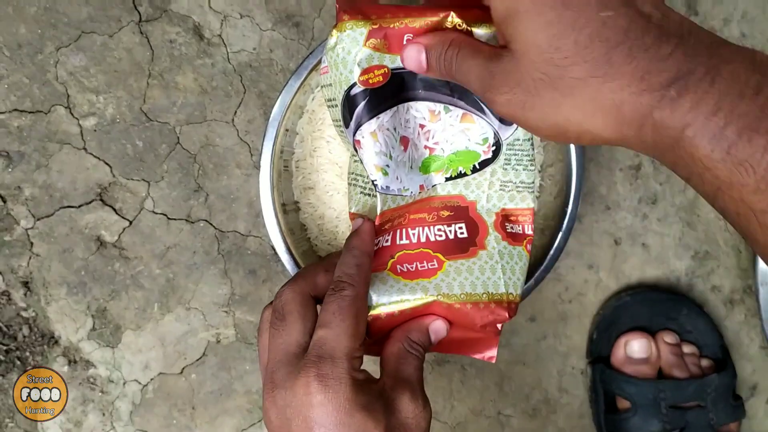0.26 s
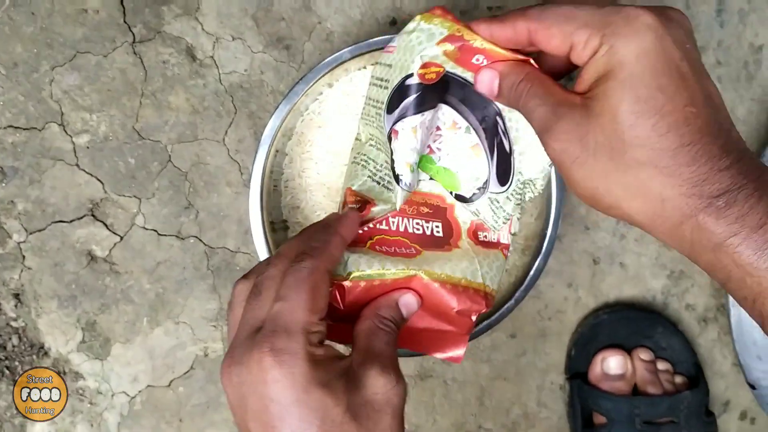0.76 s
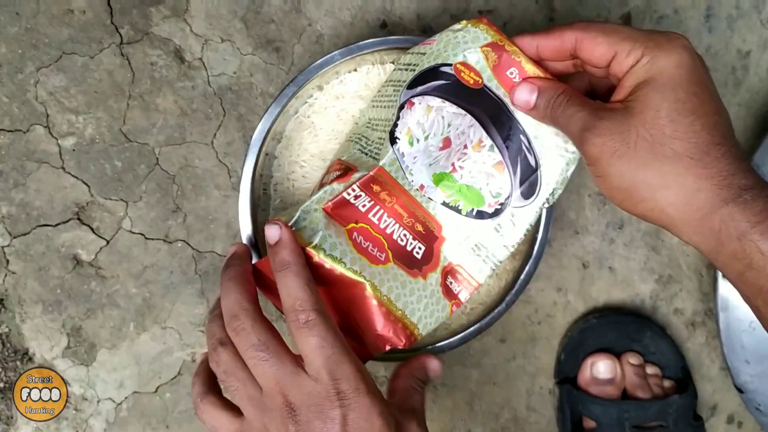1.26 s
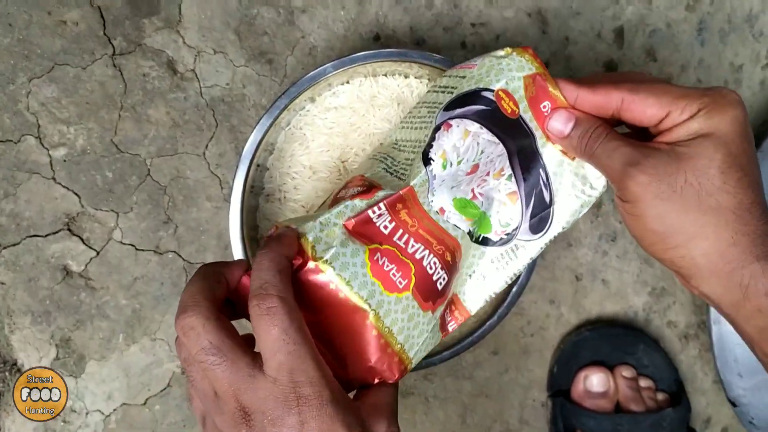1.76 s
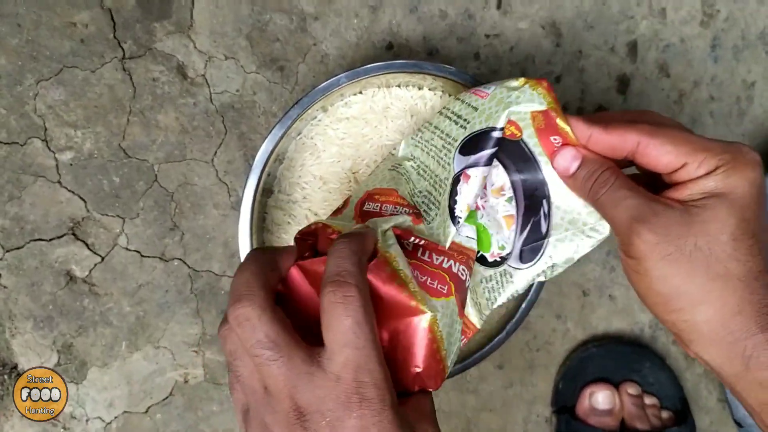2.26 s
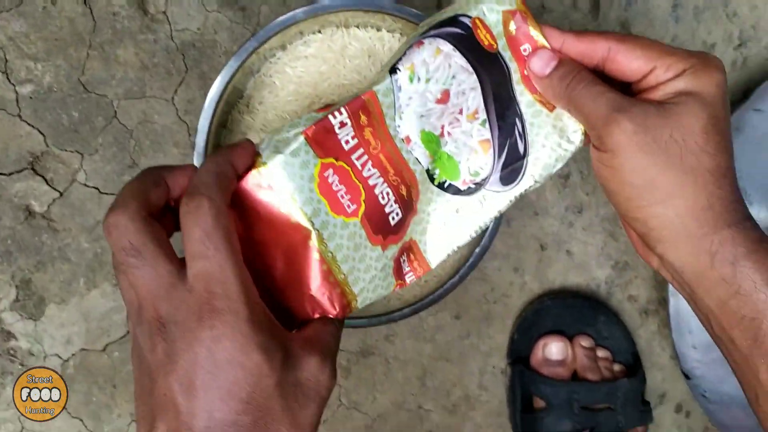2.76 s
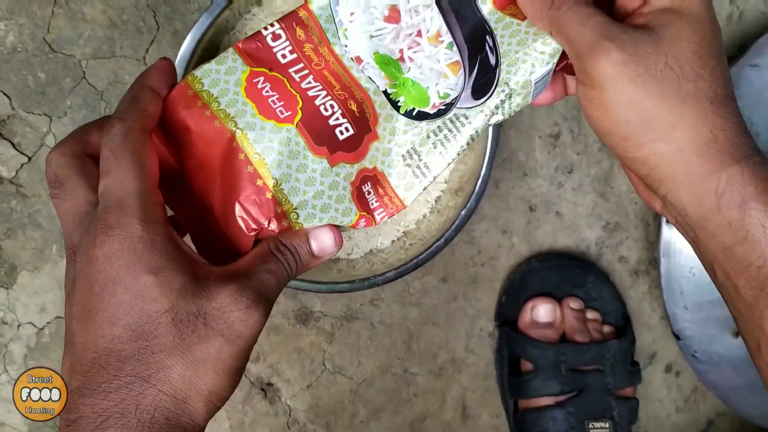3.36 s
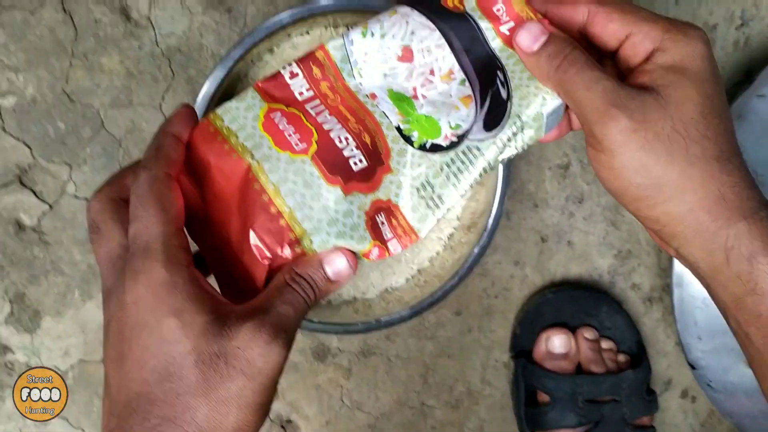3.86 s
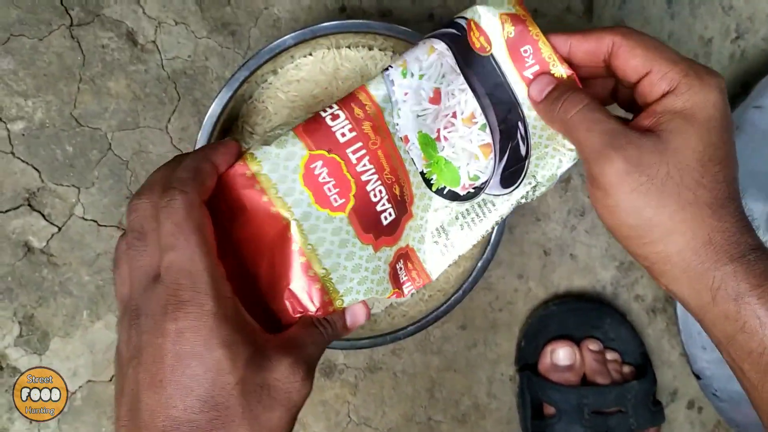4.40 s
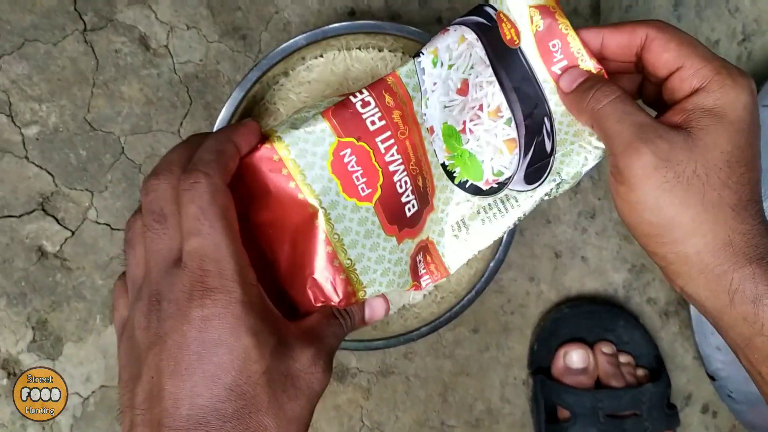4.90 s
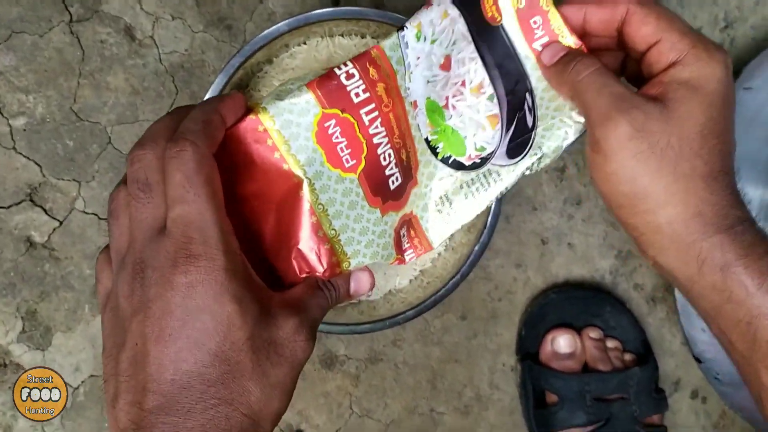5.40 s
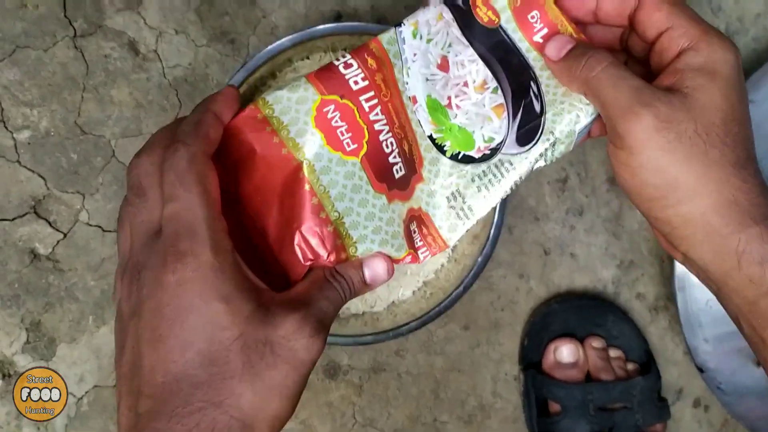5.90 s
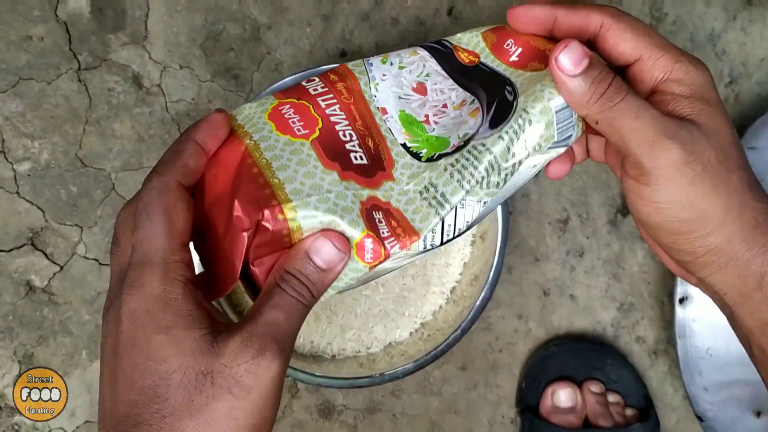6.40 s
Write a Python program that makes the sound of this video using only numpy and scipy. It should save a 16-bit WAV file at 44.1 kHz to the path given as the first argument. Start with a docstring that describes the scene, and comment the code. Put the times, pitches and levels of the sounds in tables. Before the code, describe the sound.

Dry rice falls in uneven shakes onto a heap in a metal bowl, each spill a fine high hiss with ticking grains. The thin bag buckles with hollow knocks and sharp crackles, and grains scrape along its film. Spilling is densest in the first half; later there is mainly handling and a few small spills. Close microphones, dry open yard, faint low hum.

```python
"""A thin run of dry rice and soft hollow pops of a plastic bag are heard first, close to the microphones.
Shaken from the bag onto a heap in a steel bowl, grains patter and ping as random impacts with decaying modes.
Grains spray crisply and slip along the film in rasps of narrow noise; the buckling bag pops and crinkles.
Once a fold snaps open and lets go a gush. The loaded bowl rings faintly over a low outdoor rumble."""
import sys
import numpy as np
from scipy import signal
from scipy.fft import rfft, irfft, next_fast_len
from scipy.io import wavfile
from scipy.ndimage import uniform_filter1d, map_coordinates

SR = 44100
rng = np.random.default_rng(int(sys.argv[2]) if len(sys.argv) > 2 else 0)


def pcm_store(signal):
    """Save signal as 16-bit PCM."""
    levels = np.round(np.clip(np.atleast_2d(signal), -1, 1) * 32767)
    wavfile.write(sys.argv[1], SR, levels.astype(np.int16).T)


N = 293166
TIME = np.arange(N) / SR  # s
AGE = np.arange(SR // 4) / SR  # s since the start of one event


# the thin steady run of rice between shakes: (time [s], nominal level [dB])
TRICKLE_CURVE = [(0.0, -53.5), (0.44, -66.5), (1.39, -50.5), (1.76, -54), (1.91, -46.5), (2.26, -52.5),
                 (2.65, -46.5), (3.26, -49.5), (3.76, -48), (3.92, -63.5), (4.29, -66), (5.98, -57.5),
                 (6.24, -61.5), (6.65, -56)]
# a shake spills rice on the heap: (middle of the rise [s], hold [s], nominal level [dB])
SPILL_MOVES = [(0.148, 0.085, -55), (0.862, 0.18, -56), (1.098, .13, -42), (1.424, .09, -47.5),
               (1.799, .18, -43.5), (2.274, 0.042, -45), (2.411, .05, -42), (2.586, 0.1, -46.5),
               (2.9, .13, -45), (3.274, 0.044, -51), (3.74, .17, -49.5), (5.33, 0.05, -53),
               (5.706, 0.044, -51), (5.811, 0.097, -51), (6.022, 0.05, -49.5), (6.16, 0.027, -55),
               (6.258, 0.025, -54), (6.388, 0.09, -56.5), (6.592, .06, -48)]


def fall_level():
    """Energy addition: the powers of the trickle and of each spill sum to the level of falling rice."""
    return effort(TRICKLE_CURVE, SPILL_MOVES, attack_s=.036, fall_db_per_s=168.5)


# spectrum of landing grains: (frequency [Hz], relative level [dB])
LANDING_SPECTRUM = [(900, -29), (2000, -15.5), (3000, -9), (4500, -7.5), (5600, -8), (6700, -6.5),
                    (7700, -1.5), (8900, 1.5), (10200, -1.5), (12500, -4.5), (15500, -9.5)]


def patter(level_db):
    """Shot noise: many landings merge into a hiss, while single grains excite a short resonance."""
    blows = impacts(rate=2600, spread_db=3.3, lag_ms=.41, scatter_ms=.04)
    strays = impacts(rate=150, spread_db=3.5, lag_ms=.2, scatter_ms=.3)
    thin = np.clip((-48.5 - level_db) / 12, 0, .8)  # in a thin trickle the grains are heard one by one
    stream = mottled(coloured(blows, LANDING_SPECTRUM), depth_db=6.5)
    loose = unit(coloured(strays, LANDING_SPECTRUM))
    hiss = np.sqrt(np.maximum(1 - thin ** 2, 0)) * stream + thin * loose

    single = impacts(rate=650, spread_db=2, lag_ms=.41, scatter_ms=.02)
    ticks = unit(filtered(single, lambda f: resonance(f, 8900, 1900) ** 3))
    ringing = amp(-5 + .5 * np.clip(level_db + 44.5, -30, 0))  # a thin trickle hardly rings

    # the full stream lands left of centre
    leftward = amp(np.clip(level_db + 60, 0, 8) * np.array([[.28], [-.28]]))
    return amp(level_db + 2 * wobble(70)) * (amp(-1.5) * hiss + ringing * ticks) * leftward


# a grain strikes hard and pings: (time [s], nominal peak [dB], left over right [dB])
HARD_TAPS = [(1.114, -32, 5), (1.1605, -21, 4), (1.1685, -26, 9), (1.1955, -26, 5), (1.2075, -34, 1),
             (1.221, -29, 9), (1.2385, -39, 7), (1.2475, -21.5, 8), (1.349, -27, 6), (1.4, -29, 1),
             (1.4065, -21.5, 6), (1.4828, -23.5, 16), (1.6, -27, 12), (1.713, -24.5, 7),
             (1.7775, -27.5, 10), (1.8075, -32, 12), (1.8305, -20.5, 6), (1.8495, -28, 11),
             (1.9035, -30, 11), (1.9175, -33, 18), (1.9505, -33, 13), (1.9605, -24, 16), (1.9735, -23, 7),
             (2.005, -24, 6), (2.0245, -19.5, 4), (2.046, -23.5, 8), (2.108, -26, 5), (2.2885, -32, -4),
             (2.3115, -29.5, 13), (2.4645, -42, 5), (2.5935, -21, 2), (2.6125, -17, 8), (2.6205, -15.5, 14),
             (2.6365, -22, 10), (2.6495, -24, -1), (2.6795, -19, 9), (2.7575, -29, 6), (2.7665, -19.5, 5),
             (2.7795, -20.5, 6), (2.8805, -20, 12), (2.9145, -17, 7), (2.9325, -16, 6), (2.9425, -26, 16),
             (2.9665, -29, 16), (2.9955, -27, 11), (3.0075, -27.5, 19), (3.075, -26, 10), (3.132, -33, 7),
             (3.1625, -28, 6), (3.2835, -27, 6), (3.3095, -27.5, 13), (3.3503, -27, 13), (3.4935, -27, 5),
             (3.5865, -23, 10), (6.0275, -28.5, 13), (6.0645, -27, 11), (6.1605, -28, 9), (6.287, -29, 3)]


def taps(fall_db, grain_hz=8900, width_hz=760, click_db=-12, upper_db=-17, trim_db=-7):
    """Impulse response: a hard landing gives a click and a ping of damped modes at a pitch of its own."""
    out = np.zeros((2, N))
    t = AGE[:SR // 16]
    # lesser taps come with the flow
    small = [(s, db + 10, -3 + 12.5 * rng.normal())
             for s, db in chances(fall_db, count=200, crowding=2, spread_db=.5)]
    for s, db, pan_db in list(HARD_TAPS) + small:
        hz = grain_hz * np.exp(.025 * rng.normal())
        upper_hz = grain_hz * rng.uniform(1.15, 1.5)
        blow = (t == 0) + amp(-43 - 60 * t / .024) * rng.standard_normal(len(t))
        ping = peaked(filtered(blow, lambda f: resonance(f, hz, width_hz) ** 3))
        upper = peaked(filtered(blow, lambda f: resonance(f, upper_hz, width_hz) ** 3))
        click = coloured(rng.standard_normal(len(t)) * amp(-60 * t / .008), LANDING_SPECTRUM)
        tap = ping + amp(upper_db) * upper + amp(click_db) * peaked(click)
        add(out, s, amp(db + trim_db) * placed(tap, lag_ms=.506, pan_db=pan_db))
    return out


# loose grains skitter over the film: (middle of the rise [s], hold [s], level [dB])
SPRAY_MOVES = [(0.01, 0.28, -54), (0.795, 0.0033, -49.5), (0.935, 0.086, -52), (1.109, 0.035, -39),
               (1.15, .04, -49), (1.446, 0.017, -47), (1.599, 0.0095, -44.5), (1.807, 0.089, -45),
               (1.928, .004, -35.5), (2.209, 0.011, -47), (2.418, 0.088, -47), (2.51, 0.14, -49.5),
               (2.678, .02, -45), (2.992, 0.06, -44), (3.0255, 0.001, -32), (3.237, 0.008, -38),
               (3.418, 0.03, -43), (3.576, .004, -37), (3.707, 0.074, -45), (3.863, .005, -50),
               (4.102, .004, -54.5), (4.181, 0.081, -51), (4.95, 0.32, -59.5), (5.352, 0.057, -51),
               (5.7, 0.23, -50.5), (6.127, 0.0094, -44.5), (6.268, 0.025, -64.5), (6.282, .004, -48),
               (6.58, .07, -47)]
# spectrum of the skittering: (frequency [Hz], relative level [dB])
SPRAY_SPECTRUM = [(1000, -15), (2500, -8), (5000, -10.5), (8000, -1.5), (10000, -1), (13000, -2),
                  (15500, -8)]


def sprays():
    """Shot noise: tiny blows on the taut film, bright up to the highest treble."""
    level_db = effort([(0, -67.5)], SPRAY_MOVES, attack_s=.0025, fall_db_per_s=550)
    blows = impacts(rate=3500, spread_db=2.5, lag_ms=.41, scatter_ms=.08)
    skitter = mottled(coloured(blows, SPRAY_SPECTRUM), depth_db=2.5)
    return amp(level_db) * placed(skitter, lag_ms=0, pan_db=3.5)


# the fold snaps open in quick jerks: (time [s], peak level [dB])
FOLD_JERKS = [(3.6538, -11.5), (3.6567, -17), (3.6592, -18)]
# spectrum of the fold and its grains: (frequency [Hz], relative level [dB])
GUSH_SPECTRUM = [(500, -29), (2000, -14), (3300, -11.5), (5000, -6.5), (8500, 1), (12500, 1), (15500, -6)]


def gush(spill_db=-25, spill_t60=.3):
    """Sudden release: the fold cracks open and throws a decaying burst of grains on the heap."""
    out = np.zeros((2, N))
    for s, db in FOLD_JERKS:
        slips = crackle(lead=.00021, t60=.0054, tail_db=-17, tail_t60=.12)
        crack = peaked(coloured(slips, GUSH_SPECTRUM))
        add(out, s - .006, amp(db) * placed(crack, lag_ms=.41, pan_db=1))
    blows = impacts(rate=6900, spread_db=2, lag_ms=.41, scatter_ms=.069)
    burst = mottled(coloured(blows, GUSH_SPECTRUM), depth_db=3)[:, :len(AGE)]
    add(out, FOLD_JERKS[0][0], burst * amp(spill_db - 60 * AGE / spill_t60))
    return out


# rice creeping inside the tilted bag: (time [s], nominal level [dB])
CREEP_CURVE = [(0.0, -50.5), (0.26, -52), (0.41, -65.5), (0.55, -53), (1.2, -51), (1.37, -57.5), (1.6, -50),
               (2.14, -56.5), (2.3, -55.5), (2.76, -62.5), (3.2, -53.5), (3.8, -48.5), (4.08, -61),
               (4.43, -63), (4.65, -59.5), (5.85, -56), (5.99, -65), (6.2, -55.5), (6.65, -59)]
# the load slides along the film: (middle of the rise [s], hold [s], nominal level [dB])
SLIDE_MOVES = [(0.18, 0.057, -52.5), (0.556, 0.11, -52), (0.957, 0.2, -60), (1.494, 0.055, -54),
               (1.827, .06, -45), (2.37, .08, -56), (2.649, 0.036, -54), (2.823, 0.017, -46.5),
               (3.359, 0.053, -51.5), (3.574, 0.046, -54), (3.723, 0.1, -54), (3.863, 0.079, -53),
               (4.219, 0.04, -50.5), (4.628, .11, -53), (4.941, 0.22, -53.5), (5.196, 0.033, -52),
               (5.486, 0.11, -53.5), (5.68, 0.07, -52), (5.866, 0.022, -50.5), (6.449, 0.075, -55.5),
               (6.585, 0.08, -51.5)]


def slide_level():
    """Energy addition: the powers of the creep and of each slide sum to the level of moving rice."""
    return effort(CREEP_CURVE, SLIDE_MOVES, attack_s=.013, fall_db_per_s=269.5)


# spectrum of sliding grains: (frequency [Hz], relative level [dB])
SLIDE_SPECTRUM = [(600, -16.5), (1500, -9.5), (2400, -1), (3400, -5.5), (4600, 1.5), (6200, -6),
                  (9000, -11.5), (15500, -23)]


def slide(level_db):
    """Granular friction: shifting rice makes a fine rush, and single grains tick against the film."""
    dense = impacts(rate=2600, spread_db=-1, lag_ms=.022, scatter_ms=.3)
    rush = mottled(coloured(dense, SLIDE_SPECTRUM), depth_db=5.5)
    sparse = impacts(rate=170, spread_db=1.2, lag_ms=.034, scatter_ms=.34)
    ticks = mottled(coloured(sparse, SLIDE_SPECTRUM), depth_db=5.5)
    return amp(level_db - 2 + 4.15 * wobble(40)) * (rush + amp(-1) * ticks)


# a sheet of grains slips along the film: (time [s], nominal peak [dB], pitch [Hz])
FILM_SLIPS = [(0.0455, -48, 2560), (0.088, -54, 4150), (0.222, -53, 4180), (0.25, -47.5, 4860),
              (0.349, -62, 2470), (0.4523, -48.5, 2926), (0.594, -52, 3280), (0.639, -53, 3270),
              (0.704, -50, 4530), (0.72, -50.5, 3520), (0.818, -50.5, 4920), (1.088, -52, 2800),
              (1.1247, -50, 2850), (1.25, -49.5, 3200), (1.318, -52, 3140), (1.548, -45, 2630),
              (1.6, -44, 2280), (1.635, -48.5, 5210), (1.675, -48, 4760), (1.772, -48, 2750),
              (2.0246, -46.5, 2560), (2.168, -47.5, 3020), (2.8384, -46.5, 2970), (2.9, -46, 4630),
              (2.9315, -45.5, 4460), (3.077, -49, 2610), (3.125, -48, 2330), (3.153, -48, 4580),
              (3.282, -54, 2560), (3.361, -45, 4380), (3.565, -45, 4900), (3.852, -54, 2900),
              (3.8883, -50, 4270), (4.239, -44.5, 4540), (4.2796, -45.5, 4260), (4.352, -47.5, 2440),
              (4.371, -52, 4550), (4.4884, -47, 4700), (4.563, -48.5, 3140), (4.5882, -45, 2690),
              (4.672, -45.5, 2870), (4.7, -42.5, 4610), (4.782, -44.5, 2474), (4.87, -56, 2920),
              (4.935, -51, 4420), (4.98, -53, 4950), (5.021, -45, 4780), (5.1, -50, 3900),
              (5.159, -46, 4880), (5.3055, -46, 4240), (5.3593, -42, 4860), (5.483, -55, 2590),
              (5.507, -54, 2800), (5.535, -49, 4750), (5.572, -48, 2320), (5.88, -47.5, 3054),
              (6.048, -47.5, 4500), (6.057, -45, 2515), (6.2, -51, 2810), (6.256, -50.5, 5080),
              (6.304, -51.5, 4670), (6.325, -53, 4530), (6.417, -45, 2086), (6.464, -46.5, 2410),
              (6.581, -45.5, 3900)]


def rasps(slide_db, width=.2, spurt_t60=.11, t60=.15, linger_db=-5, overtone_db=-6, glide=.0876,
          fizz_db=-11, trim_db=-1.5):
    """Stick-slip friction: grains rub at a rough, drifting pitch with its octave."""
    out = np.zeros((2, N))
    decay = amp(-60 * AGE / spurt_t60) + amp(linger_db - 60 * AGE / t60)
    shape = (1 - np.exp(-AGE / .0015)) * decay
    # lesser slips come as the load slides
    small = [(s, db + .5, 3900 * 2 ** (.3 * rng.normal()))
             for s, db in chances(slide_db, count=30, crowding=1, spread_db=2)]
    for s, db, hz in list(FILM_SLIPS) + small:
        drift = glide * rng.normal() * np.tanh((AGE - .012) / .0475)
        phase = 2 * np.pi * np.cumsum(hz * (1 + drift)) / SR
        # axes: cosine or sine part, fundamental or octave, one direct and two scattered paths, time
        re, im = narrow_noise((2, 2, 3, len(AGE)), width * hz)
        octave = amp(overtone_db - 13.6 * max(np.log2(hz / 2600), 0))  # fast slips are nearly pure
        rub = re[0] * np.cos(phase) + im[0] * np.sin(phase)
        rub = rub + octave * (re[1] * np.cos(2 * phase) + im[1] * np.sin(2 * phase))
        rub = rub * unit(amp(2 * narrow_noise(len(AGE), width_hz=160)))  # the grains catch and jump
        fizz = unit(coloured(rng.standard_normal(rub.shape), LANDING_SPECTRUM))
        rub = rub + amp(fizz_db) * fizz  # the grains tick against each other
        # one part reaches both ports directly, the rest is scattered by bag and bowl
        heard = placed(rub[0], lag_ms=.08, pan_db=-4) + 1.54 * rub[1:]
        add(out, s - .0015, amp(db + trim_db) * shape / shape.max() * heard)
    return out


# rustle of the bag wall under a resting grip: (time [s], nominal level [dB])
GRIP_CURVE = [(0.0, -59.5), (0.31, -70), (2.16, -60.5), (3.02, -68.5), (3.66, -60.5), (3.85, -68),
              (5.05, -67.5), (5.68, -59), (6.13, -70), (6.65, -60)]
# the fingers squeeze the bag: (middle of the rise [s], hold [s], nominal level [dB])
SQUEEZE_MOVES = [(0.0, .07, -51.5), (0.515, .06, -48.5), (0.976, .09, -58), (1.468, .08, -53.5),
                 (1.859, .03, -52), (2.01, .08, -55.5), (2.246, .05, -52.5), (2.491, .1, -51),
                 (2.988, .04, -56.5), (3.474, .25, -56.5), (4.294, .03, -59.5), (4.547, 0.028, -53),
                 (4.741, .09, -57.5), (5.044, .07, -55), (5.361, .56, -57), (6.578, .1, -53)]


def rustle_level():
    """Energy addition: the powers of the resting grip and of each squeeze sum to the rustle level."""
    return effort(GRIP_CURVE, SQUEEZE_MOVES, attack_s=.015, fall_db_per_s=219)


# spectrum of the bag wall: (frequency [Hz], relative level [dB])
WALL_SPECTRUM = [(120, -27), (300, -2), (650, -1), (1200, -2.5), (2000, -6.5), (4000, -17)]


def rustle(level_db):
    """Shot noise: the bag wall gives many soft creases under the fingers."""
    blows = impacts(rate=400, spread_db=3, lag_ms=.21, scatter_ms=.26)
    return amp(level_db - 3 + 2.9 * wobble(30)) * unit(coloured(blows, WALL_SPECTRUM))


# a panel of the bag buckles: (time [s], nominal peak [dB], panel pitch [Hz])
PANEL_BUCKLES = [(0.026, -38.5, 590), (0.053, -36.5, 764), (0.1125, -26.5, 560), (0.234, -42.5, 800),
                 (0.456, -39, 790), (0.472, -37, 1060), (0.511, -40, 764), (0.521, -39, 780),
                 (0.533, -26, 734), (0.543, -32, 766), (0.549, -39, 696), (0.557, -35, 920),
                 (0.579, -34, 740), (0.572, -24, 716), (0.615, -35, 754), (0.857, -36, 1430),
                 (0.877, -26, 620), (1.023, -39, 1080), (1.043, -38, 600), (1.054, -36, 750),
                 (1.268, -38, 390), (1.484, -37.5, 600), (1.507, -37, 710), (1.538, -36.5, 716),
                 (1.593, -32, 2050), (1.704, -34.5, 820), (1.724, -30, 1180), (1.833, -29, 450),
                 (1.886, -20, 1030), (1.892, -27.5, 554), (1.931, -38, 1130), (2.016, -36, 1140),
                 (2.046, -35.5, 1160), (2.067, -39, 764), (2.095, -33.5, 835), (2.21, -35, 610),
                 (2.217, -33, 604), (2.261, -30, 730), (2.278, -32.5, 575), (2.289, -36, 900),
                 (2.299, -34.5, 460), (2.503, -28.5, 870), (2.511, -35, 600), (2.539, -30.5, 815),
                 (2.549, -40, 610), (2.561, -32.5, 500), (2.571, -42, 700), (2.589, -31.5, 780),
                 (2.66, -27.5, 1210), (2.996, -41.5, 552), (3.418, -36, 1105), (3.446, -36.5, 700),
                 (3.505, -34.5, 394), (3.621, -42, 1150), (3.651, -40, 380), (4.038, -31.5, 1150),
                 (4.1, -37, 298), (4.125, -42.5, 736), (4.304, -34.5, 543), (4.315, -40.5, 620),
                 (4.378, -38.5, 740), (4.4465, -36.5, 322), (4.546, -34, 1050), (4.579, -29.5, 456),
                 (4.5815, -32, 895), (4.742, -39.5, 1010), (4.776, -33.5, 2300), (4.833, -41.5, 730),
                 (4.842, -38, 674), (4.956, -39, 1130), (4.981, -36.5, 1100), (5.052, -41, 696),
                 (5.109, -36, 358), (5.237, -31, 1140), (5.349, -42, 690), (5.383, -30.5, 1060),
                 (5.525, -32.5, 1380), (5.636, -30.5, 1100), (5.69, -27, 2100), (5.735, -36.5, 1190),
                 (5.883, -39, 1080), (6.149, -39.5, 1045), (6.267, -44, 374), (6.376, -43, 800),
                 (6.414, -43, 2130)]
# modes of the bag's air and film: (frequency [Hz], width [Hz], relative level [dB])
BAG_MODES = [(380, 720, -8.5), (770, 110, 2.5), (1105, 78, 4.5), (1520, 62, -2.5), (1665, 110, -0.5),
             (2560, 2100, -10)]
PANEL_CYCLES = 12.8  # a panel's fundamental falls 60 dB in this many swings


def bag_response(f):
    """Modal superposition: the bag's damped modes add with alternating sign."""
    return sum((-1) ** k * amp(db) * resonance(f, centre, width)
               for k, (centre, width, db) in enumerate(BAG_MODES))


def pops(rustle_db, overtone_db=-9, flutter_t60=.076, flutter_db=-15, body_db=-3, snap_db=16, trim_db=-4.5):
    """Snap-through buckling: a panel rings at its pitch, and its flutter sounds the hollow of the bag."""
    out = np.zeros((2, N))
    t = np.maximum(AGE - .006, 0)
    # lesser buckles come with the squeezing
    small = [(s, db + 10, 917 * 2 ** (.45 * rng.normal()))
             for s, db in chances(rustle_db, count=30, crowding=1.4, spread_db=4.5)]
    for s, db, hz in list(PANEL_BUCKLES) + small:
        t60 = PANEL_CYCLES / hz  # low panels ring longer
        overtone = np.sin(2 * np.pi * hz * rng.uniform(1.76, 2.17) * t)
        panel = np.sin(2 * np.pi * hz * t) + amp(overtone_db - 30 * t / t60) * overtone
        panel = panel * amp(-60 * t / t60) * (1 - np.exp(-t / .00021))
        push = crackle(lead=.004, t60=.0082, tail_db=flutter_db, tail_t60=flutter_t60)
        push[np.argmax(t > 0)] += amp(snap_db)  # the panel snaps through
        body = filtered(push, bag_response)
        pop = peaked(peaked(panel) + amp(body_db) * peaked(body))
        add(out, s - .0045, amp(db + trim_db) * placed(pop, lag_ms=.11, pan_db=-1.5))
    return out


# a crease snaps: (time [s], nominal peak [dB], left over right [dB], nominal body boost [dB])
CREASE_SNAPS = [(0.511, -30, 2, 6), (0.5315, -27, -2, 10), (0.5435, -27, -2, 11), (0.5565, -22.5, -3, 6),
                (0.5723, -15.5, 1, 6), (0.858, -16, 0, -10), (0.8783, -21, 3, 5), (0.9005, -17, 1, -2),
                (1.4835, -13.5, -0.5, -19), (1.8875, -7.5, -2.5, -4.5), (1.8898, -20, 7, -9),
                (1.9322, -13.5, -1, -7.5), (1.9345, -20, 3, -14), (2.094, -21.5, -2, -6),
                (2.2795, -17.5, 1, -11.5), (2.289, -19, -10, -15), (2.5041, -22.5, -6, -1),
                (2.6608, -14, -1, -7), (3.0238, -10.5, 2, -28), (3.03, -22.5, 5, -25),
                (3.3504, -25, 7, -19), (3.434, -22, -1, -20), (3.804, -19, -5, -11.5),
                (3.8635, -25, -2, -29), (3.9175, -29, 0, -35), (4.3805, -36.5, 0, 10), (4.4465, -54, 2, 12),
                (4.581, -26, -2, 7), (4.7778, -30, 0, 4), (4.7845, -29, -4, 7), (5.2346, -25.5, 5, -23),
                (5.5255, -25.5, -1, 4), (5.6755, -22.5, -1, -3), (5.683, -24, 0, -2),
                (5.6919, -8, -2.5, -7), (5.6985, -18, 8, -6), (5.744, -27, -2, -3), (5.8845, -35, -2, -6),
                (5.9235, -28.5, -2, -22), (6.4152, -20.5, 3, -1), (6.587, -19, 1, -16),
                (6.609, -21, 2.5, -14)]
# spectrum of creases: (frequency [Hz], relative level [dB])
CREASE_SPECTRUM = [(400, -13.5), (1500, -1.5), (4000, -2.5), (8500, 4.5), (12000, -3.5), (16000, -9)]


def crinkles(rustle_db, tail_db=-14, snap_db=9, trim_db=-10):
    """Bistable flip: a crease gives one sharp snap and a short crackle, with its own share of body."""
    out = np.zeros((2, N))
    # lesser creases come with the squeezing
    small = [(s, min(db + 20.5, -33), 11 * rng.normal(), 1)
             for s, db in chances(rustle_db, count=40, crowding=.51, spread_db=0)]
    for s, db, pan_db, body_db in list(CREASE_SNAPS) + small:
        crack = crackle(lead=.0008, t60=.015, tail_db=tail_db, tail_t60=.028)
        crack[round(.006 * SR)] += amp(snap_db)
        crack = coloured(crack, CREASE_SPECTRUM)
        shelf_db = np.clip(body_db + 10, -15, 15)  # acts below about 5 kHz
        crack = filtered(crack, lambda hz: amp(shelf_db / (1 + (hz / 5000) ** 4)))
        lag_ms = .072 + .033 * rng.normal()
        add(out, s - .0052, amp(db + trim_db) * placed(peaked(crack), lag_ms=lag_ms, pan_db=pan_db))
    return out


# the bag is dragged under the fingers or along the rim:
# (start [s], end [s], nominal level [dB], first pitch [Hz], last pitch [Hz], width [Hz])
FILM_DRAGS = [(1.623, 1.739, -61.5, 271, 298, 55), (5.157, 5.276, -59, 253, 219, 62),
              (5.278, 5.72, -61.5, 1375, 1690, 190), (5.66, 5.948, -60, 1670, 1180, 190),
              (5.781, 5.923, -49, 6220, 7400, 1000), (5.88, 6.021, -63.5, 262, 203, 60.3),
              (6.139, 6.237, -56.5, 235, 300, 70.4)]


def rubs():
    """Sliding friction: dragged film gives a narrow rushing tone that swells, glides and fades."""
    out = np.zeros((2, N))
    for start, end, db, first_hz, last_hz, width_hz in FILM_DRAGS:
        n = max(int((end - start) * SR), 256)
        phase = 2 * np.pi * np.cumsum(np.linspace(first_hz, last_hz, n)) / SR
        grip = amp(1.5 * narrow_noise(n, width_hz=29))
        a, b = unit(grip * narrow_noise((2, n), width_hz))
        tone = placed(a * np.cos(phase) + b * np.sin(phase), lag_ms=.023, pan_db=1)
        add(out, start, amp(db) * signal.windows.tukey(n, .6) * tone)
    return out


# modes of the steel bowl, damped by its load: (frequency [Hz], relative level [dB], 60 dB decay [s])
BOWL_MODES = [(738, 0, .6), (1141, -2, .4), (7724, -3, .2), (8988, 0, .15), (9121, -1, .15),
              (9557, -2, .15), (9740, -3, .15), (10528, 0, .2), (11199, -1, .2), (11326, 0, .2),
              (11563, -2, .2), (11658, 0, .2), (12409, 0, .2), (13770, -1, .2)]


def bowl(blows):
    """Modal ringing by convolution: grains and bag excite the steel, with other mode phases at each port."""
    t = np.arange(SR) / SR
    ring = sum(amp(db - 60 * t / t60) * np.sin(2 * np.pi * (hz * t + rng.random((2, 1))))
               for hz, db, t60 in BOWL_MODES)
    return signal.fftconvolve(blows, ring / np.linalg.norm(ring[0]), axes=1)[:, :N]


# reverberation of the yard: (frequency [Hz], 60 dB decay [s])
YARD_DECAY = [(200, 0.099), (1500, 0.085), (8000, 0.13), (16000, 0.0067)]


def yard(x):
    """Diffuse reflection: ground and walls answer as decaying noise, different at each port."""
    hz, t, z = signal.stft(rng.standard_normal((2, SR // 3)), SR, nperseg=256)
    decay = amp(-60 * t / along(YARD_DECAY, hz)[:, None])
    tail = signal.istft(z * decay, SR, nperseg=256)[1]
    tail = np.pad(tail, ((0, 0), (130, 0)))  # starts about 3 ms late
    return signal.fftconvolve(x, tail / np.linalg.norm(tail[0]), axes=1)[:, :N]


# spectrum of the background: (frequency [Hz], relative level [dB])
RUMBLE_SPECTRUM = [(20, -44), (35, -25), (52, 2), (80, 0.5), (105, 1.5), (140, -4), (250, -13.5),
                   (500, -17), (1200, -25), (4000, -27), (15000, -26)]


def background(rumble_db=-58, hum_db=-68, hum_hz=102.8):
    """Partly coherent noise: distant rumble almost alike at both ports, with a phase-modulated hum."""
    noise = rng.standard_normal(N) + .29 * rng.standard_normal((2, N))
    air = unit(coloured(noise, RUMBLE_SPECTRUM))
    hum = np.sin(2 * np.pi * hum_hz * TIME + 2 * wobble(9.5))
    return amp(rumble_db) * air + amp(hum_db) * unit(hum)


def impacts(rate, spread_db, lag_ms, scatter_ms):
    """Shot noise: random blows of uneven size, each with its own delay between the ports."""
    draw = np.random.default_rng(rng.integers(2 ** 31)).random((int(rate * N / SR), 4))
    size = amp(-spread_db * np.log(np.maximum(draw[:, 1], np.exp(-4)))) * np.sign(draw[:, 2] - .5)
    lag = (lag_ms + scatter_ms * (2 * draw[:, 3] - 1)) * SR / 1000  # samples
    at = draw[:, 0] * N
    return np.array([np.bincount(np.round(at + d).astype(int) % N, size, N) for d in (lag, 0)])


def crackle(lead, t60, tail_db, tail_t60):
    """Strain release: noise swells at a rate set by lead, cracks 6 ms in, and leaves a chatter."""
    t = AGE - .006
    before = .3 * np.exp(-np.abs(t) / lead)
    after = amp(-60 * np.abs(t) / t60) + amp(tail_db - 60 * np.abs(t) / tail_t60)
    slips = unit(amp(3 * np.clip(narrow_noise(len(t), width_hz=700), -2, 1.5)))
    return slips * rng.standard_normal(len(t)) * np.where(t < 0, before, after)


def effort(rest, moves, attack_s, fall_db_per_s):
    """Energy addition: level in dB of a resting curve plus moves that each rise, hold and die away."""
    power = amp(np.interp(TIME, *np.transpose(rest))) ** 2
    for s, hold, db in moves:
        rise = np.clip((TIME - s) / attack_s + .5, 0, 1)
        fall_db = fall_db_per_s * np.maximum(TIME - s - hold, 0)
        power = power + (rise * amp(db - fall_db)) ** 2
    return 10 * np.log10(power)


def chances(level_db, count, crowding, spread_db):
    """Inhomogeneous sampling: random (s, dB) events come thicker and louder where the level is high."""
    tally = np.cumsum(amp(crowding * level_db))
    quantile = (np.arange(count) + rng.random(count)) / count
    at = np.searchsorted(tally, quantile * tally[-1])
    return np.transpose([TIME[at], level_db[at] + spread_db * rng.standard_normal(count)])


def mottled(x, depth_db):
    """Spectral modulation: a smoothed random gain over time and frequency makes the sound patchy."""
    z = signal.stft(x, nperseg=256)[2]
    field = rng.standard_normal(z.shape[1:])
    field = uniform_filter1d(uniform_filter1d(field, size=4, axis=0), size=4, axis=1)
    return unit(signal.istft(z * amp(depth_db * unit(field)), nperseg=256)[1][:, :x.shape[-1]])


def narrow_noise(shape, width_hz):
    """Band-limited noise: slow noise of rms 1, the roughness of a band that wide."""
    return unit(filtered(rng.standard_normal(shape), lambda f: 1 / (1 + (f / width_hz) ** 4)))


def wobble(rate):
    """Random modulation: a smooth curve through rate random knots a second."""
    return map_coordinates(rng.standard_normal(int(N * rate / SR) + 4), [TIME * rate])


def resonance(f, centre, width):
    """Damped oscillator: the complex response of one mode."""
    return 1j * f * width / (centre ** 2 - f ** 2 + 1j * f * width)


def placed(x, lag_ms, pan_db):
    """Stereo time and level difference: the left port is later by lag_ms and louder by pan_db."""
    side = np.array([[.5], [-.5]])
    delayed = filtered(x, lambda hz: np.exp(-2j * np.pi * hz * side * lag_ms / 1000))
    return amp(side * pan_db) * delayed


def filtered(x, response):
    """Linear filtering: the spectrum of x times a complex response of frequency."""
    n = x.shape[-1]
    m = next_fast_len(n + 4096)
    return irfft(rfft(x, m) * response(np.fft.rfftfreq(m, 1 / SR)), m)[..., :n]


def coloured(x, spectrum):
    """Spectral shaping: x weighted by (Hz, dB) points."""
    return filtered(x, lambda hz: amp(along(spectrum, hz)))


def along(points, hz):
    """Logarithmic frequency scale: (Hz, value) points interpolated at hz."""
    f, v = np.transpose(points)
    return np.interp(np.log(hz + 1), np.log(f), v)


def amp(db):
    """Decibel law: level to amplitude gain."""
    return 10 ** (np.asarray(db) / 20)


def unit(x):
    """Energy normalization: x at rms 1."""
    return x / np.sqrt(np.mean(x ** 2) + 1e-20)


def peaked(x):
    """Short-time energy: x with its loudest millisecond at rms 1."""
    return x / np.sqrt(uniform_filter1d(x ** 2, size=44).max() + 1e-20)


def add(track, s, sound):
    """Superposition: mix a sound into a track from time s on."""
    part = track[:, max(round(s * SR), 0):][:, :sound.shape[-1]]
    part += sound[..., :part.shape[-1]]


def scene():
    """Superposition of rice, bag, bowl, yard and background."""
    fall_db, slide_db, rustle_db = fall_level(), slide_level(), rustle_level()
    falling = patter(fall_db) + sprays() + gush()
    pings = taps(fall_db)
    moving_rice = slide(slide_db) + rasps(slide_db)
    bag = moving_rice + rustle(rustle_db) + pops(rustle_db) + crinkles(rustle_db) + rubs()
    steel = bowl(amp(-21) * (falling + pings) + amp(-26) * bag)
    echo = amp(-11) * yard(falling + bag + amp(-6) * pings)
    return falling + pings + bag + steel + echo + background()


def record(dry):
    """Band limitation: a very steep low-pass at 15750 Hz."""
    return filtered(dry, lambda hz: 1 / np.sqrt(1 + (hz / 15750) ** 160))


dry = scene()
out = record(dry)
pcm_store(out)
```